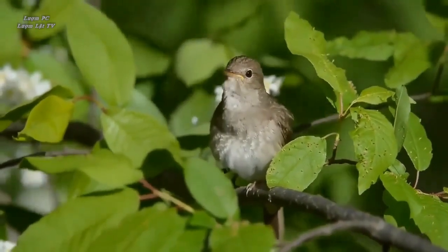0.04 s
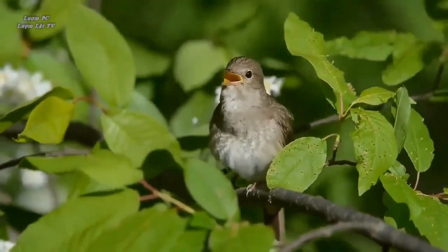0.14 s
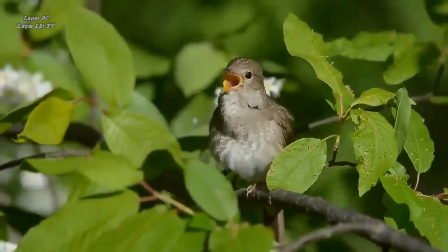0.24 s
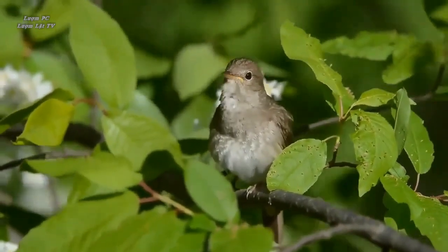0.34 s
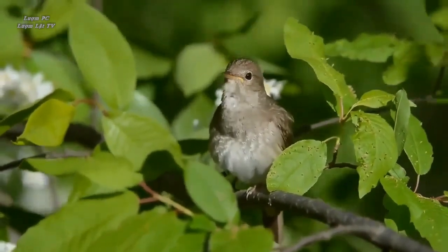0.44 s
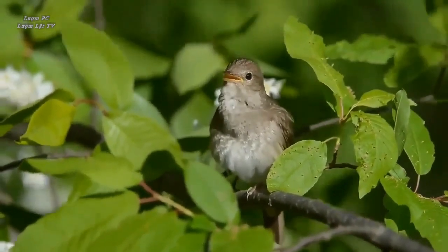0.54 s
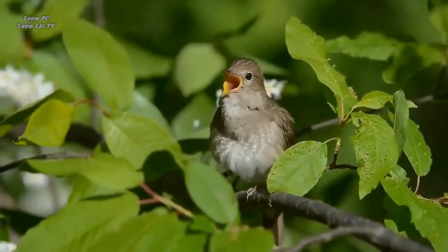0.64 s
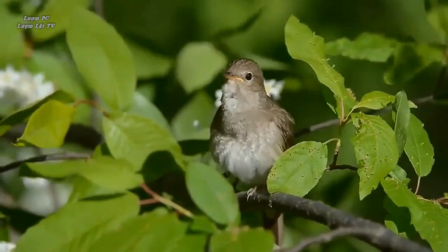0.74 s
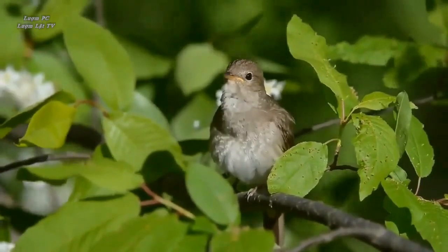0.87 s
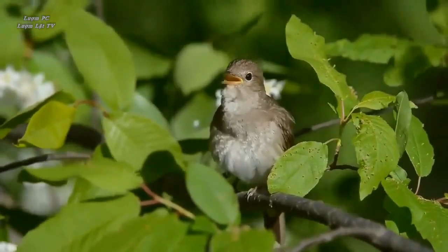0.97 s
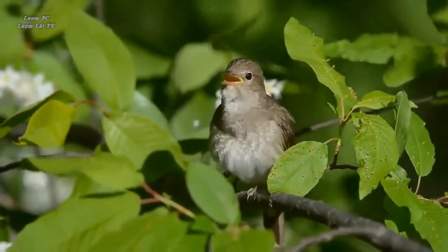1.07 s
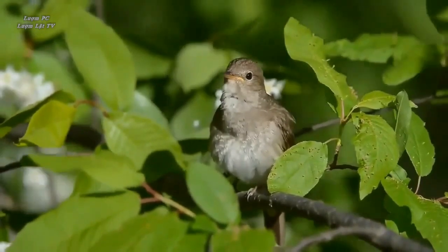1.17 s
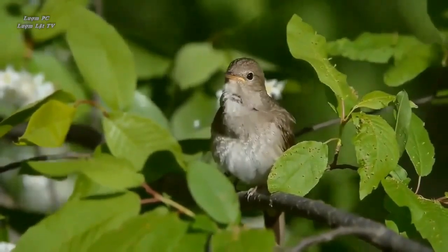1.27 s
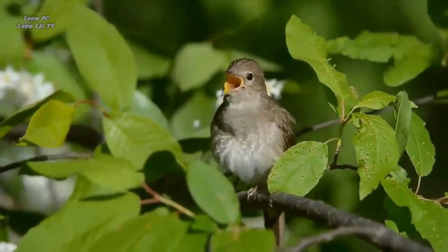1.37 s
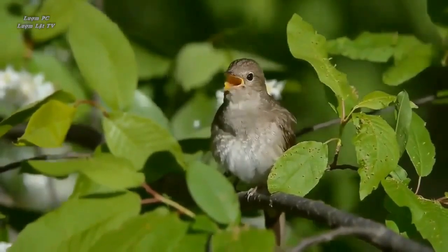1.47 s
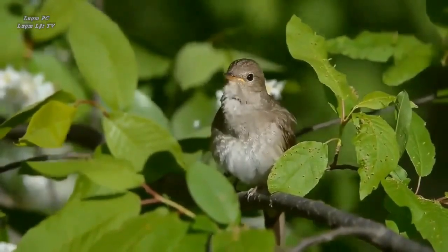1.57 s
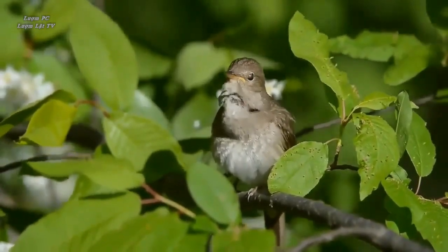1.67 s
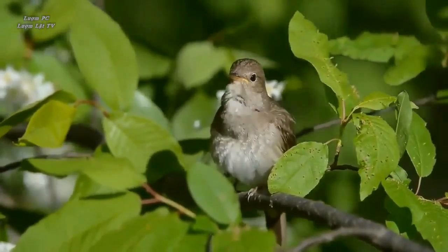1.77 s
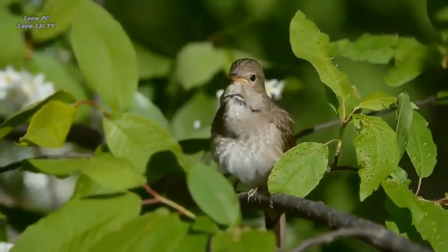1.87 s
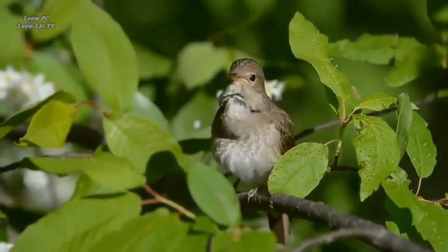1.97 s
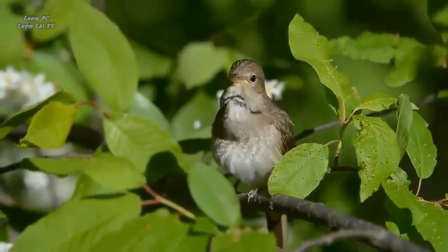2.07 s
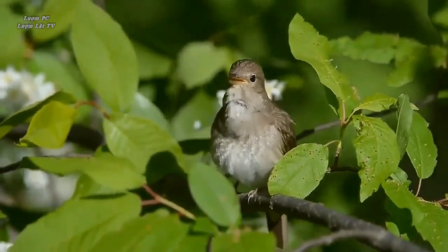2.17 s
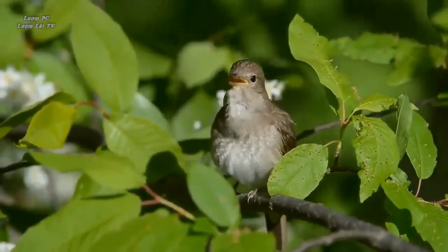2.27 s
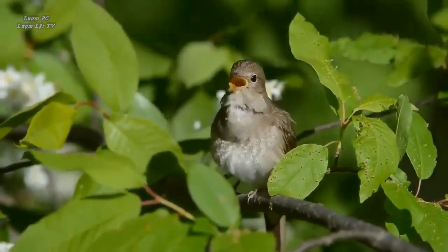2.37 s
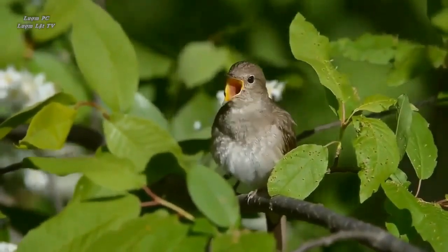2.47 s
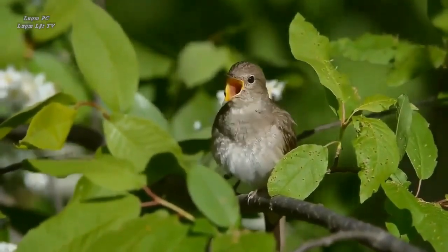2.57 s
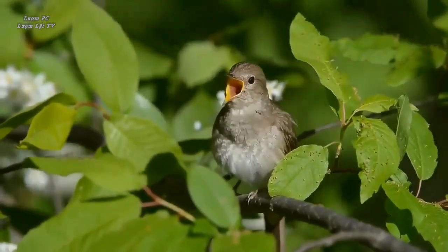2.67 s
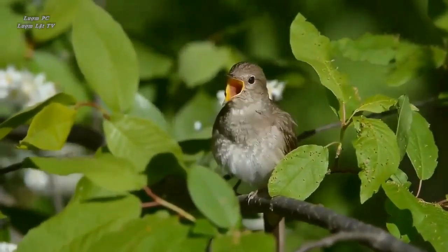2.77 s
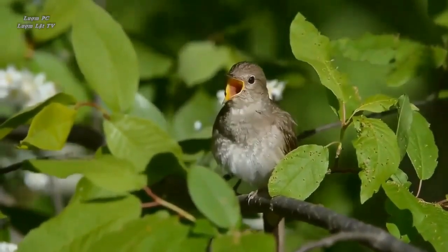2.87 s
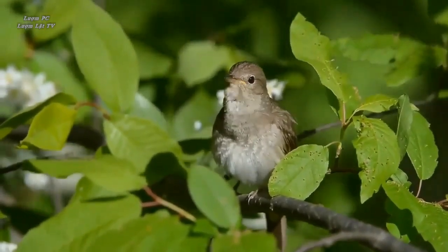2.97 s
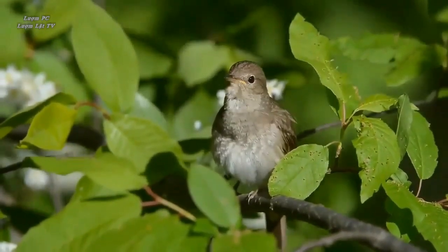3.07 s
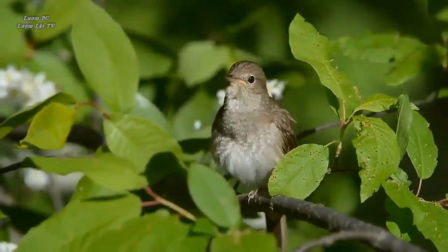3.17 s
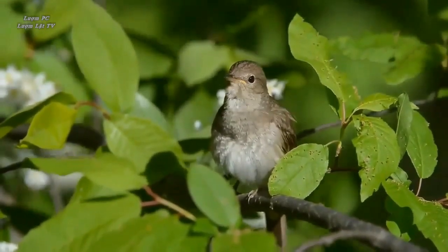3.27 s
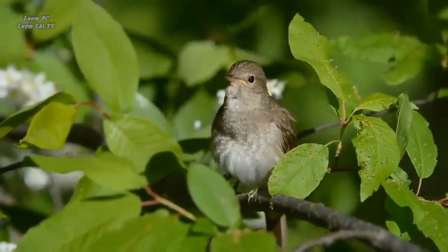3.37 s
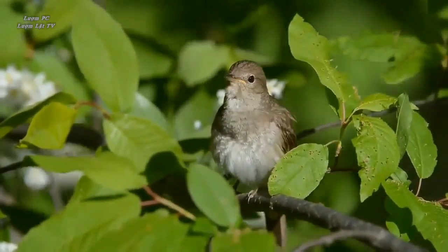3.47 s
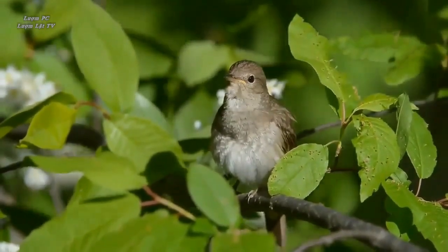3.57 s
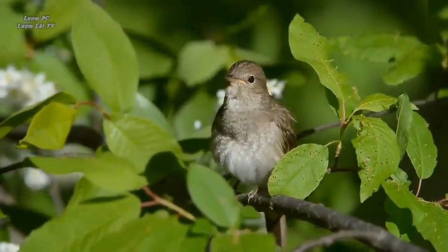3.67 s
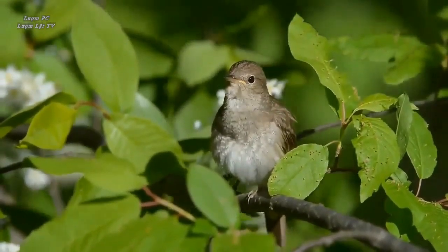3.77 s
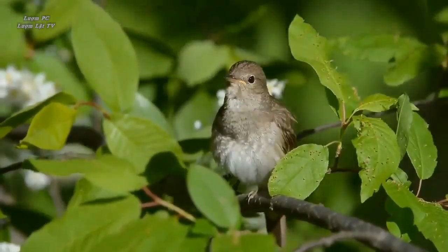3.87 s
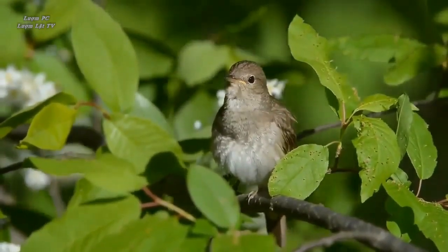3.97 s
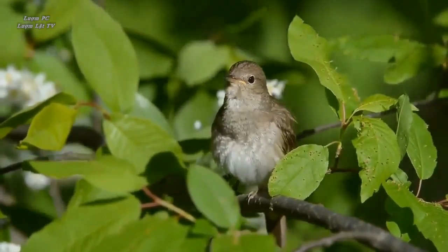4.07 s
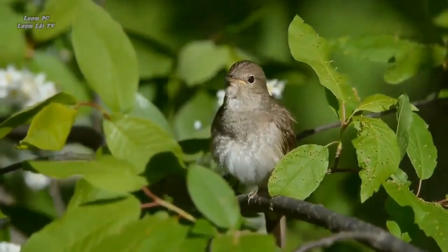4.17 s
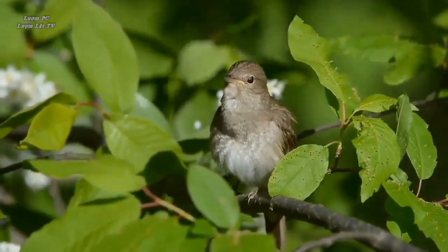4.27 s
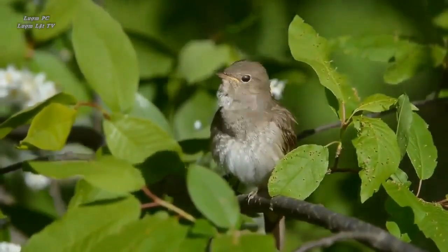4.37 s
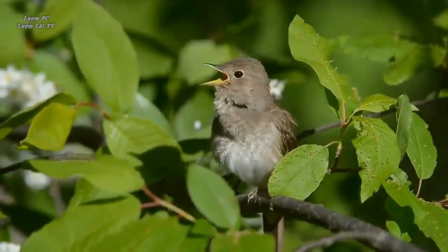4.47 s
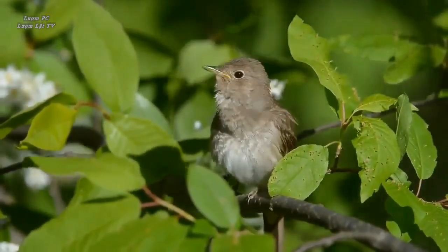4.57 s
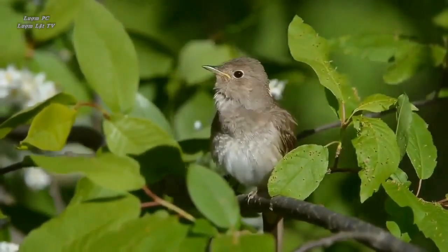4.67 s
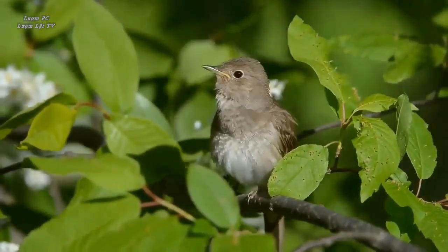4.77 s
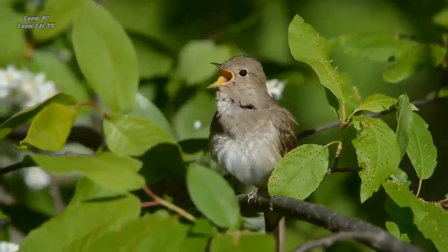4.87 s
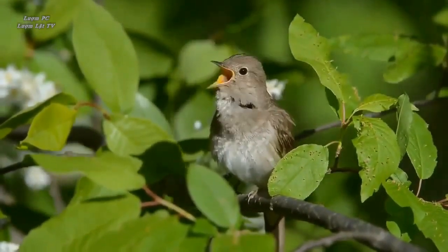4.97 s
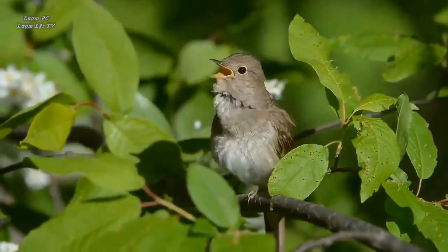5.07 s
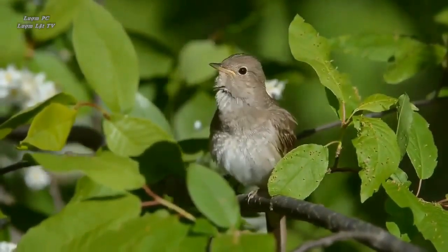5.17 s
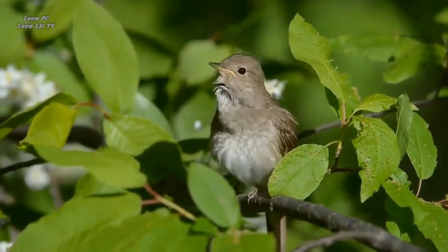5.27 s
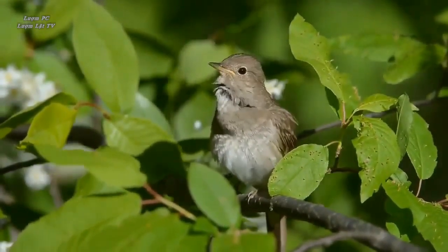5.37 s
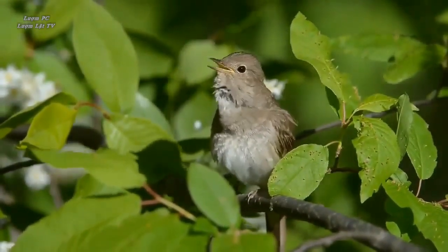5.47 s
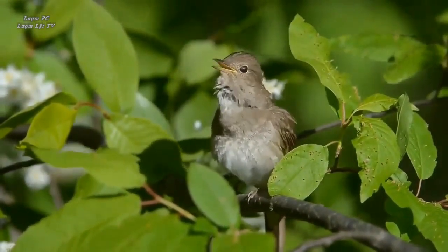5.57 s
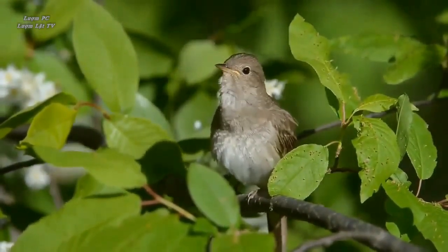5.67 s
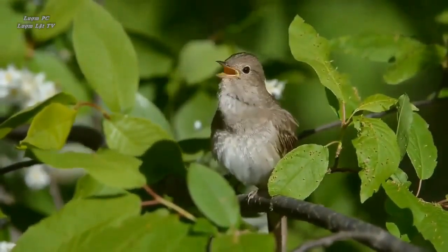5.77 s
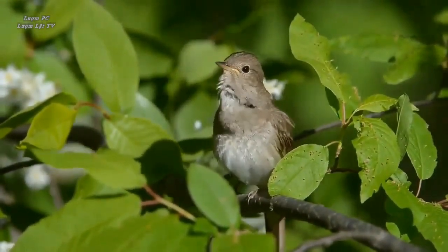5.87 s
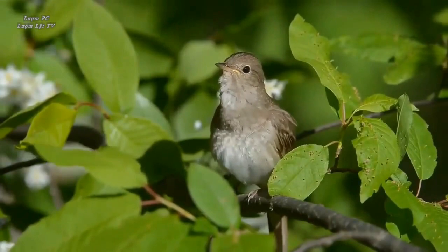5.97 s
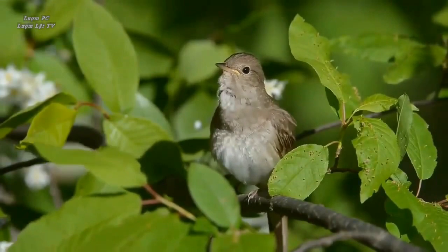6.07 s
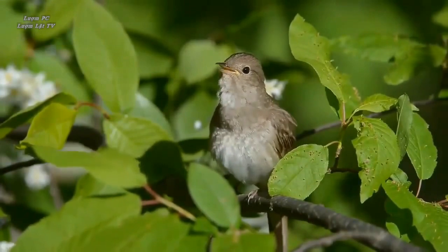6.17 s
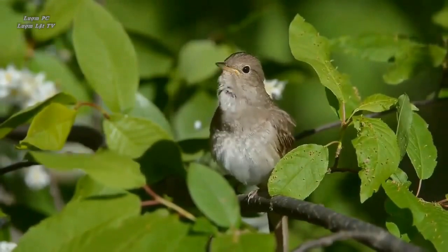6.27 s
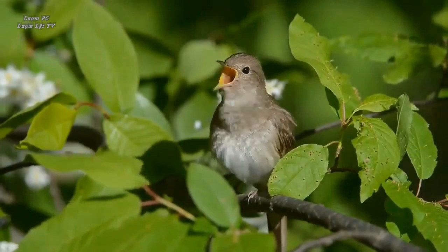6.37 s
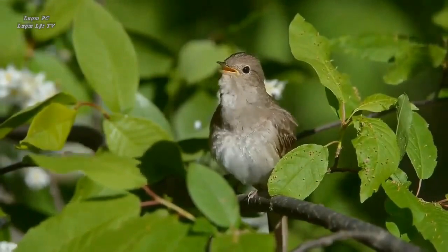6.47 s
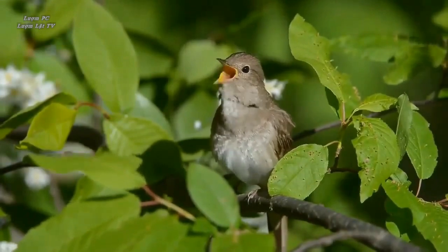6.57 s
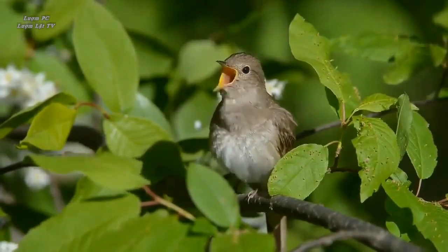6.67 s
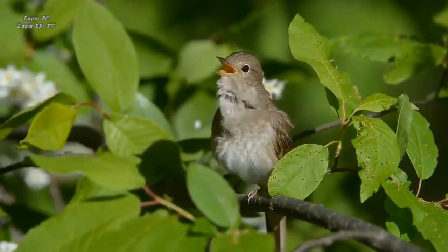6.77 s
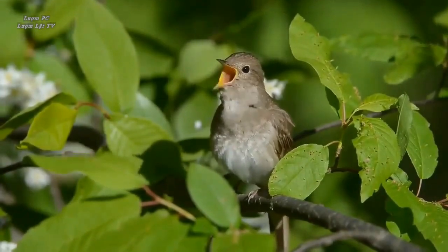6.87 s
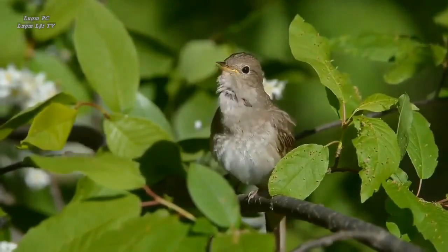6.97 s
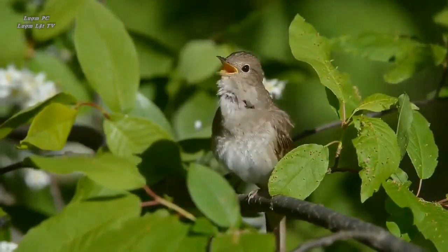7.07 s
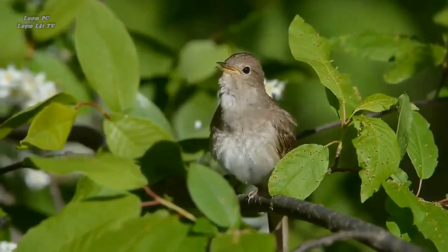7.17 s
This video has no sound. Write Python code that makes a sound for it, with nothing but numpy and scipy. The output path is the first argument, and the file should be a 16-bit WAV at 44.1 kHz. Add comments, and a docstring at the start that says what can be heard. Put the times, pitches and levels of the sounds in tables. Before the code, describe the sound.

Close songbird outdoors: sharp whistles, throaty clicks and quick falling chips ending in a buzzing rattle, a pause, then pipes, low warbles and repeated toos.

```python
"""A nightingale sings two phrases from a leafy branch: glides, double clicks, falling chucks, a rattle and whistles.
Its notes are gliding near sines with two overtones; its clicks are noise slaps ringing throat resonances.
A near reflection notches the voice and the foliage scatters it into a short tail.
Behind are faint wavering tones, an insect-like band of hiss, low country noise in half-octave bands
and a thin high line, a sine in the middle with a narrow high hiss before and after."""
import sys
import numpy as np
from scipy import signal
from scipy.io import wavfile
from scipy.ndimage import uniform_filter1d

SR = 44100
rng = np.random.default_rng(int(sys.argv[2]) if len(sys.argv) > 2 else 0)


def bounce(signal):
    """Save signal as a 16-bit WAV file at the path given by the first command-line argument."""
    frames = np.transpose(np.atleast_2d(signal))
    limited = np.clip(frames, -1, 1)
    pcm = np.round(limited * 32767).astype(np.int16)
    wavfile.write(sys.argv[1], SR, pcm)


N = 318843
T = np.arange(N) / SR
CUTOFF_HZ = 16050


# Whistled syllable shapes [t/s from the start, f/Hz, level/dB]
SEEP = [(0, 8400, -43), (.011, 7800, -25.5), (.017, 7070, -2.5), (.022, 6140, -2), (.027, 5560, -5),
        (.031, 5250, -20), (.036, 5080, -35)]
HOOK = [(0, 4050, -50), (.04, 3760, -26.5), (.056, 3620, -9.5), (.068, 3600, -4), (.08, 3775, -14),
        (.086, 3800, -1), (.098, 3930, -1.5), (.1026, 4290, -8), (.108, 4278, -1.5), (.118, 4190, -31)]
SLUR = [(0, 2540, -31.5), (.009, 2746, -16), (.018, 2807, 2), (.025, 2734, 3), (.035, 2450, -0.4),
        (.042, 2276, 1), (.048, 2170, -13), (.057, 2120, -16), (.063, 2070, -43)]
HUM = [(0, 1050, -22), (.007, 1030, -6), (.013, 1096, -1.5), (.075, 1127, 1.3), (.109, 1103, 0.5),
       (.119, 1031, -3.5), (.125, 1080, -14)]
# When they are sung [t/s, level/dB added to the shape, length/s, pitch shift/semitones]
SEEPS = [(0.1865, -7.5, 0.039, 0.012), (0.567, -8, 0.039, 0.01), (4.349, -30.5, 0.042, 1.6)]
HOOKS = [(.27, -3.5, 0.12, 0.006), (.657, -3.5, 0.12, 0.01)]
SLURS = [(4.713, -5.5, 0.067, 0.76), (5.167, -3, 0.067, 0.01)]
HUMS = [(5.366, -28.5, 0.124, 0.0079)]


def whistles():
    """Pure whistles and glides: the syrinx sings nearly sinusoidal notes without added hiss."""
    return syllables((SEEP, SEEPS), (HOOK, HOOKS), (SLUR, SLURS), (HUM, HUMS)) + pipes()


# Level pipes [t/s of full voice, level/dB, length/s, f/Hz, swell/dB, overshoot/Hz,
# level dip/s after full voice, dip level/dB]
PIPES = [(4.535, -11, .084, 3194, 4.5, 120.5, .075, -17), (4.996, -5.5, 0.095, 3065, 0, 30, 0.064, -3)]
PIPE_RISE_S, PIPE_SETTLE_S, DIP_S, PIPE_FALL_S = .03, 0.0063, 0.0054, 0.014
PIPE_SCOOP_HZ, PIPE_FLICK_HZ = -220, 60.5
PIPE_WAVER_HZ, PIPE_WAVER_DB = 14, .6


def pipes():
    """Each pipe scoops up, overshoots, holds (and may swell), dips briefly in level and flicks up at its end."""
    out = np.zeros(N)
    for s, db, length, hz, swell_db, overshoot, dip, dip_db in PIPES:
        def held_db(t):
            """Level of the hold, swelling over its first half."""
            return db + swell_db * min(2 * t / length, 1)

        rows = [(-PIPE_RISE_S, hz + PIPE_SCOOP_HZ, db - 29.5),
                (-PIPE_RISE_S / 2, hz, db - 17),
                (0, hz + overshoot, db),
                (PIPE_SETTLE_S, hz - overshoot / 3, db + 0.5),
                (dip - 2 * DIP_S, hz, held_db(dip)),
                (dip - DIP_S, hz, held_db(dip)),
                (dip, hz, held_db(dip) + dip_db),
                (dip + DIP_S, hz + PIPE_FLICK_HZ / 2, held_db(dip)),
                (length, hz + PIPE_FLICK_HZ / 2, held_db(length) - 7),
                (length + PIPE_FALL_S, hz + PIPE_FLICK_HZ, db - 22.5)]
        add_note(out, wavering(np.array(rows) + [s, 0, 0], .006, PIPE_WAVER_HZ, PIPE_WAVER_DB))
    return out


# Falling syllable shapes [t/s from the start, f/Hz, level/dB]
CHUCK = [(0, 2700, -88), (.002, 2564, -3.5), (.005, 2120, 1), (.009, 1717, -9), (.014, 1353, -17.5),
         (.021, 1100, -18.5), (.026, 960, -30.5), (.0285, 800, -48)]
CHIP = [(0, 2790, -83), (.0012, 2464, -8), (.0025, 2325, -7.5), (.005, 1870, -2), (.008, 1450, -9.5),
        (.012, 1150, -18), (.017, 972, -26), (.0215, 804, -36)]
# When they are sung [t/s, level/dB added to the shape, length/s, pitch shift/semitones]
CHUCKS = [(1.313, 1.6, 0.0285, .05), (1.7583, 2.1, 0.0285, 0.046)]
CHIPS = [(1.925, -4, 0.013, -0.74), (1.9723, -0.5, 0.013, -0.44), (2.0508, -0.5, 0.016, -.3),
         (2.098, 0.5, 0.016, -0.056), (2.1776, 2.5, 0.016, 0.053), (2.2243, 2, 0.018, .1),
         (2.3028, 1.5, 0.017, 0.031), (2.353, 3.5, 0.015, 0.044), (2.4298, 5, 0.019, 0.19),
         (2.4793, 2.5, 0.014, 0.27)]


def chucks():
    """Chucks and quick chips: the pitch plunges within some 30 ms, with a faint high hiss."""
    return with_hiss(syllables((CHUCK, CHUCKS), (CHIP, CHIPS)), 7000, 14500, -42)


# Warble shapes, falling and arched [t/s from the start, f/Hz, level/dB]
WARBLE_DOWN = [(0, 2500, -41), (.003, 2047, 4), (.0055, 1828, 5.5), (.011, 1757, 0), (.018, 1742, 6),
               (.033, 1789, -2), (.042, 1750, 5), (.046, 1526, -4.5), (.052, 1365, -11.5),
               (.058, 1160, -46)]
WARBLE_ARCH = [(0, 1213, -27), (.006, 1403, -3.5), (.014, 1721, 4.5), (.022, 1824, -1.5), (.029, 1740, 8),
               (.033, 1600, -0.5), (.039, 1362, -3.5), (.046, 895, -28.5)]
# When they are sung [t/s, level/dB added to the shape, length/s, pitch shift/semitones]
WARBLES_DOWN = [(5.6, -4.5, .056, -0.17), (5.8915, -3.5, .058, 0.11)]
WARBLES_ARCH = [(5.663, -9.5, .044, 0.089), (5.958, -9.5, .046, 0.024)]


def warbles():
    """Low warbles in pairs: one pitch curve falls, the next arches up and over."""
    voice = syllables((WARBLE_DOWN, WARBLES_DOWN), (WARBLE_ARCH, WARBLES_ARCH))
    return with_hiss(voice, 10000, 13000, -35.5)


# Shape of a "too" [t/s from the start, f/Hz, level/dB]
TOO = [(0, 3890, -68), (.0025, 3508, 1), (.0045, 3273, 2), (.009, 2813, -4.5), (.013, 2410, -3),
       (.018, 2144, -1), (.023, 2050, -2.5), (.041, 2021, -4.5), (.046, 2160, -2), (.0495, 2140, -38)]
# When it is sung [t/s, level/dB added to the shape, length/s, pitch shift/semitones]
TOOS = [(6.3289, 1, 0.046, 0.0095), (6.4975, 0.16, 0.053, 0.13), (6.668, 0.31, 0.052, 0.26),
        (6.84, 0.15, 0.054, 0.24), (7.008, 0, 0.054, 0.085), (7.178, 0.18, 0.052, 0.26)]


def toos():
    """Repeated whistled toos: each drops steeply in pitch, then holds."""
    return with_hiss(syllables((TOO, TOOS)), 9680, 11300, -43.5)


# The two voices of one rattle pulse [t/s from the pulse peak, f/Hz, level/dB]
RATTLE_HIGH = [(-.0034, 7300, -32), (-.002, 7300, -15), (-.001, 7250, -8), (-.0002, 7050, 0),
               (.0005, 6700, -3), (.0011, 6200, -14), (.0018, 5800, -34)]
RATTLE_LOW = [(-.0018, 5900, -38), (-.001, 5200, -26), (0, 4400, -22), (.0012, 3900, -27),
              (.0022, 3500, -42)]
# Level curve of the pulses [t/s, level/dB]
RATTLE_LEVEL = [(2.58, -11), (2.592, 0.5), (2.612, -12), (2.63, -4), (2.72, -3), (2.84, -1), (2.9, -4),
                (2.99, -5), (3.021, -7)]
# Pulses start hurried, settle within a few beats and then slowly tire
RATTLE_START_S, RATTLE_PULSES, RATTLE_GAP_S = 2.5811, 36, .01245
HURRY_S, HURRY_PULSES, TIRING_S_PER_PULSE, UNEVEN_S = .00737, 3.16, .0000503, .0002
# The low voice follows only a share of the level changes around LOW_VOICE_DB
RATTLE_UNEVEN_DB, LOW_VOICE_DB, LOW_VOICE_FOLLOWS = 1.5, -3.5, 0.21


def rattle():
    """Both sides of the syrinx flick together in tiny glides, a little differently each time."""
    out, beat = np.zeros(N), np.arange(RATTLE_PULSES)
    gaps = RATTLE_GAP_S + TIRING_S_PER_PULSE * beat - HURRY_S * np.exp(-beat / HURRY_PULSES)
    times = RATTLE_START_S + np.cumsum(gaps) - gaps
    chances = rng.standard_normal((RATTLE_PULSES, 5))
    for beat_s, (high_bend, low_bend, low_lag, late, push) in zip(times, chances):
        db = np.interp(beat_s, *np.transpose(RATTLE_LEVEL)) + RATTLE_UNEVEN_DB * push
        s = beat_s + UNEVEN_S * late
        # a later low voice is also a louder one
        low_db = LOW_VOICE_DB + LOW_VOICE_FOLLOWS * (db - LOW_VOICE_DB) + 1.7 * low_lag
        low_s = s + .0003 * low_lag
        add_note(out, np.array(RATTLE_HIGH) * [1, 1 + .007 * high_bend, 1] + [s, 0, db])
        add_note(out, np.array(RATTLE_LOW) * [1, 1 + .02 * low_bend, 1] + [low_s, 0, low_db])
    out = with_hiss(out, 8800, 10400, -20.5, lag_s=0.012)
    out = with_hiss(out, 11800, 13700, -28, lag_s=0.006)
    return with_hiss(out, 3400, 6200, -19, lag_s=.006)


# Double clicks [t/s, level/dB, second slap/s after the first, its level/dB]
DOUBLE_CLICKS = [(0.9066, -13, 0.0068, -11), (1.0494, -11.5, 0.007, -9.5), (1.1848, -10.5, 0.0072, -10.5),
                 (1.474, -9.5, .0071, -9.5), (1.6115, -13, 0.0072, -8)]
# Single clicks [t/s, level/dB]
SINGLE_CLICKS = [(6.1408, -2.5), (6.3048, -4), (6.4743, -3), (6.6457, -1.5), (6.8175, -1.5), (6.9855, -2.5),
                 (7.1554, -1)]
# Throat resonances [f/Hz, width/Hz, level/dB]
THROAT = [(1875, 315, 1.5), (2980, 670, 5), (5290, 1450, 8), (6700, 1320, 4.5), (9550, 810, -7),
          (12750, 2800, -11.5)]
# Decay settings of the slap shape, which is applied twice
CLICK_T60_S, SECOND_SLAP_T60_S = 0.057, 0.03


def clicks():
    """A few milliseconds of uneven slaps of the membranes ring the throat."""
    slaps, t = np.zeros(N), np.arange(round(.015 * SR)) / SR
    rows = [(s, db, CLICK_T60_S) for s, db, *_ in DOUBLE_CLICKS + SINGLE_CLICKS]
    rows += [(s + gap, db, SECOND_SLAP_T60_S) for s, _, gap, db in DOUBLE_CLICKS]
    for s, db, t60 in rows:
        shape = np.minimum(t / 0.001, 1) * amp(-60 * np.maximum(t - .002, 0) / t60)
        # some grains stick out of the noise
        spikes = rng.exponential(1, len(t)) * (rng.random(len(t)) < .15)
        grain = rng.standard_normal(len(t)) * (0.99 + spikes)
        slap = shape * rms_one(grain * shape) / rms_one(shape).max()
        start = round(s * SR)
        slaps[start:start + len(t)] += amp(db - 3.5) * slap
    out = np.zeros(N)
    for k, (hz, width, db) in enumerate(THROAT):
        ring = resonance(resonance(slaps, hz, width), hz, 1.87 * width)
        out += (-1) ** k * amp(db) * ring  # neighbours alternate in sign
    return out


# Unsteadiness of every point of a syllable: share of pitch, dB
UNSTEADY_PITCH, UNSTEADY_DB = .006, .8


def syllables(*kinds):
    """Each repeated syllable is stretched and shifted to its row, with every turn a little off."""
    out = np.zeros(N)
    for shape, sung in kinds:
        for s, db, length, shift in sung:
            stretch, transpose = length / shape[-1][0], 2 ** (shift / 12)
            rows = np.array(shape) * [stretch, transpose, 1] + [s, 0, db]
            bend, push = rng.standard_normal((2, len(rows)))
            rows[:, 1] *= 1 + UNSTEADY_PITCH * bend
            rows[:, 2] += UNSTEADY_DB * push
            add_note(out, rows)
    return out


# Clean second overtone [f/Hz of the overtone, level/dB relative to the fundamental]
SECOND = [(2000, -7.5), (3600, -43), (5000, -38), (6200, -29.5), (7500, -36.5), (9000, -30), (11500, -53),
          (14000, -30.5)]
# Rough third overtone [f/Hz of the overtone, level/dB relative to the fundamental, before roughening]
THIRD = [(3000, -49), (5400, -51), (7500, -37), (8400, -58.5), (9500, -35), (11500, -28.5), (13000, -36)]


def add_note(out, rows):
    """One gliding note: a near sine, a clean second overtone and a third roughened by slow noise."""
    s, hz, db = np.transpose(rows)
    a, b = max(int(s[0] * SR), 0), min(int(s[-1] * SR), N)
    length = b - a

    def smooth(values):
        """The curve through the points, its corners rounded."""
        return uniform_filter1d(np.interp(T[a:b], s, values), size=min(45, length // 12))

    pitch, level = smooth(hz), amp(smooth(db))
    phase = 2 * np.pi * (np.cumsum(pitch) / SR + rng.random())
    slow_noise = uniform_filter1d(rng.standard_normal(length), size=50)
    rough = rms_one(uniform_filter1d(slow_noise, size=50))
    second = amp(at_hz(SECOND, 2 * pitch)) * np.sin(2 * phase)
    third = amp(at_hz(THIRD, 3 * pitch)) * (.8 + rough) * np.sin(3 * phase)
    third = third * (3 * pitch < CUTOFF_HZ)
    ramp = np.arange(length)
    fade = np.minimum(np.minimum(ramp, ramp[::-1]) / 20, 1)
    out[a:b] += (np.sin(phase) + second + third) * level * fade


def with_hiss(voice, low_hz, high_hz, hiss_db, lag_s=0.0069):
    """Band-limited hiss follows the loudness of the note, smoothed over lag_s."""
    loud = uniform_filter1d(np.abs(voice), size=round(lag_s * SR))
    hiss = band(band(rng.standard_normal(N), low_hz, high_hz), low_hz, high_hz)
    return voice + amp(hiss_db) * loud * rms_one(hiss)


def wavering(rows, step_s, hz, db):
    """The rows with points added every step_s, pitch and level unsteady by hz and db."""
    s, pitch, level = np.transpose(rows)
    t = np.union1d(s, np.arange(s[0], s[-1], step_s))
    chance = rng.standard_normal((len(t), 2))
    unsteady_pitch = np.interp(t, s, pitch) + hz * chance[:, 0]
    unsteady_level = np.interp(t, s, level) + db * chance[:, 1]
    return np.transpose([t, unsteady_pitch, unsteady_level])


# Cancellations by the near reflection [f/Hz, width/Hz, level/dB at strength 1]
NOTCHES = [(1270, 90, -6), (1490, 70, -4), (1815, 150, -13), (2220, 130, -18), (2750, 160, -11),
           (3170, 110, -8)]


def near_reflection(x, strength):
    """Direct and reflected sound cancel at a row of low pitches; high up the reflection is a faint slap."""
    slap = amp(-14) * band(x, 4500, 9000)
    for hz, width, db in NOTCHES:
        depth, half = amp(strength * db / 2), np.pi * width / SR
        c = -2 * np.cos(2 * np.pi * hz / SR)
        zeros = [1 + half * depth, c, 1 - half * depth]
        poles = [1 + half / depth, c, 1 - half / depth]
        x = signal.lfilter(zeros, poles, x)
    lag = round(.002 * SR)
    return x + np.concatenate([np.zeros(lag), slap[:-lag]])


def foliage(x):
    """Countless leaf echoes: quick scatter close by and a longer tail from the wood, duller with time."""
    t = np.arange(SR) / SR
    near = amp(-44) * amp(-60 * t / .15) * rng.standard_normal(SR) * np.clip((t - .004) / .004, 0, 1)
    near = near + amp(5.5) * band(near, 5730, 17000)  # small leaves scatter the high notes most
    wood = rng.standard_normal((2, SR)) * np.clip((t - .006) / 0.0017, 0, 1)
    low = amp(-54.0) * amp(-60 * t / 0.59) * band(wood[0], 790, 6400)
    high = amp(-50.5) * amp(-60 * t / 0.35) * band(wood[1], 6330, 15000)
    return signal.fftconvolve(x, near + low + high)[:N]


# Faint tones, straight glides before wavering: dying tails of an earlier note, then quiet whistles
# [t/s, length/s, first f/Hz, last f/Hz, first level/dB, last level/dB]
FAINT_TONES = [(0, 0.21, 5000, 5064, -27, -55), (0, 0.19, 6060, 5960, -28, -56),
               (0.078, 0.25, 3300, 3434, -44.5, -50), (.03, 0.32, 1825, 1780, -50, -56),
               (0.016, 0.32, 1507, 1494, -56, -53), (0.381, 0.061, 6350, 4840, -48, -46),
               (0.448, .065, 5080, 4850, -39, -45), (0.601, 0.019, 4050, 4700, -54, -42),
               (0.634, 0.046, 4700, 3970, -42, -51), (3.942, .11, 3350, 3390, -48, -54.5),
               (4.08, 0.075, 3320, 3270, -52.5, -57), (4.42, 0.073, 3270, 3180, -49, -46.5),
               (4.908, 0.075, 3220, 3240, -49, -37)]
FAINT_FADE_S, FAINT_FADE_DB, FAINT_WAVER_HZ = 0.011, -10, 30


def faint_tones():
    """Faint tones: dying tails of an earlier note, then quiet whistles, all wavering in pitch and level."""
    out = np.zeros(N)
    for s, length, first_hz, last_hz, first_db, last_db in FAINT_TONES:
        end = s + length
        rows = [(s - FAINT_FADE_S, first_hz, first_db + FAINT_FADE_DB),
                (s, first_hz, first_db),
                (end, last_hz, last_db),
                (end + FAINT_FADE_S, last_hz, last_db + FAINT_FADE_DB)]
        add_note(out, wavering(rows, 0.022, FAINT_WAVER_HZ, 1.5))
    return band(out, 1000, 7000) * amp(3 * flicker(25))


def insect_like_hiss():
    """A narrow band of hiss from noise through two resonances, its level drifting slightly."""
    hiss = resonance(resonance(rng.standard_normal(N), 2176, 350), 2176, 350)
    return amp(-55.0 + 1.3 * flicker(1.6)) * rms_one(hiss)


# Tilt of the outdoor noise, only relative levels matter [f/Hz, level/dB per Hz]
AIR = [(18, -17), (28, -14), (50, -13), (104, -3), (254, -7), (400, -6.5), (560, -2.5), (760, -8),
       (1000, -6), (1610, -10), (3000, -9), (7400, -15), (11000, -26.5), (13000, -29.5), (15500, -27)]


def air():
    """Half-octave bands of outdoor noise, each drifting alone and a little with the others."""
    edges = 14 * 2 ** np.arange(0, 10.3, .5)
    white, together = rng.standard_normal((2, N)), flicker(10)
    out, together_db = 0, 1.3
    for k, (low, high) in enumerate(zip(edges, edges[1:])):
        level_db = at_hz(AIR, np.sqrt(low * high)) + together_db * together + 2.1 * flicker(11.0)
        out = out + amp(level_db) * band(white[k % 2], low, high)
    return amp(-49) * rms_one(out)


# The high line sounds between these times [from t/s, to t/s]
LINE_S = 2.475, 4.355
LINE_HZ = 15676


def high_line():
    """A thin high line in the middle, a narrow high hiss before and after."""
    inside = (T > LINE_S[0]) & (T < LINE_S[1])
    line_share = uniform_filter1d(inside * 1., size=1800)
    line = np.sin(2 * np.pi * LINE_HZ * T)
    narrow_hiss = rms_one(band(rng.standard_normal(N), 15270, 15850))
    return amp(-54) * line_share * line + amp(-61) * (1 - line_share) * narrow_hiss


def amp(db):
    """Decibels to gain."""
    return 10 ** (np.asarray(db) / 20)


def rms_one(x):
    """Scaled to rms 1."""
    return x / np.sqrt(np.mean(x ** 2) + 1e-20)


def at_hz(points, hz):
    """A spectrum read on a log-frequency axis."""
    f, db = np.transpose(points)
    return np.interp(np.log(hz), np.log(f), db)


def band(x, low_hz, high_hz):
    """Butterworth band-pass, second order at each edge."""
    return signal.sosfilt(signal.butter(2, [low_hz, high_hz], "band", fs=SR, output="sos"), x)


def resonance(x, hz, width):
    """Two-pole resonance, gain about 1 on top."""
    r = np.exp(-np.pi * width / SR)
    zeros = np.array([1, 0, -1]) * (1 - r * r) / 2
    return signal.lfilter(zeros, [1, -2 * r * np.cos(2 * np.pi * hz / SR), r * r], x)


def flicker(rate):
    """Chance drift: noise low-passed at rate (Hz), rms 1."""
    return rms_one(signal.sosfilt(signal.butter(2, rate, fs=SR, output="sos"), rng.standard_normal(N)))


def scene():
    """The singer with its echoes over the background; the whistles catch less of the notches."""
    pure = whistles()
    rest = chucks() + warbles() + toos() + rattle() + clicks()
    faint = faint_tones()
    direct = near_reflection(pure, strength=.35) + near_reflection(rest, strength=1)
    scattered = foliage(pure + rest + 3 * faint)
    return (direct + scattered + faint + insect_like_hiss() + air() + high_line())[None]


def record(dry):
    """Peaks beyond .99 clip, then a steep elliptic low-pass cuts the top."""
    top_cut = signal.ellip(16, .3, 110, CUTOFF_HZ, fs=SR, output="sos")
    return signal.sosfilt(top_cut, np.clip(dry, -.99, .99))


dry = scene()
out = record(dry)
bounce(out)
```